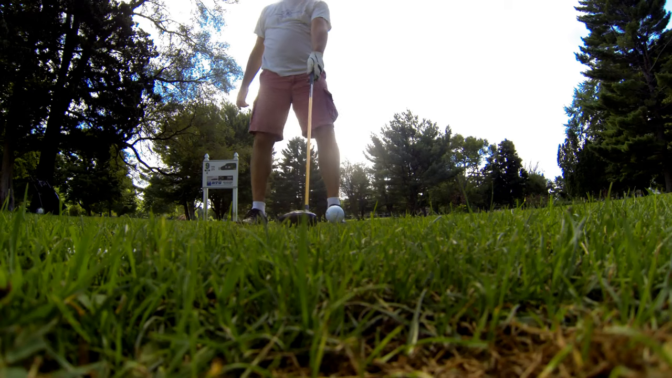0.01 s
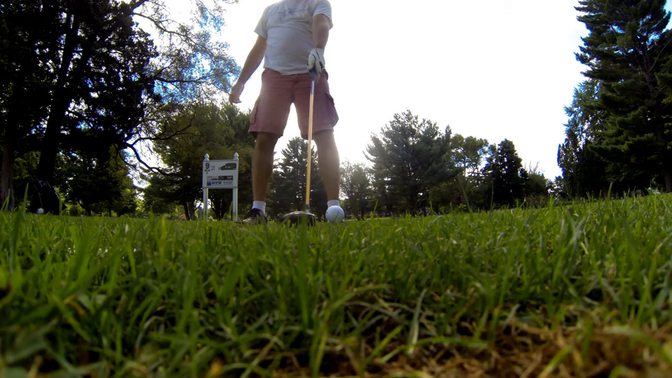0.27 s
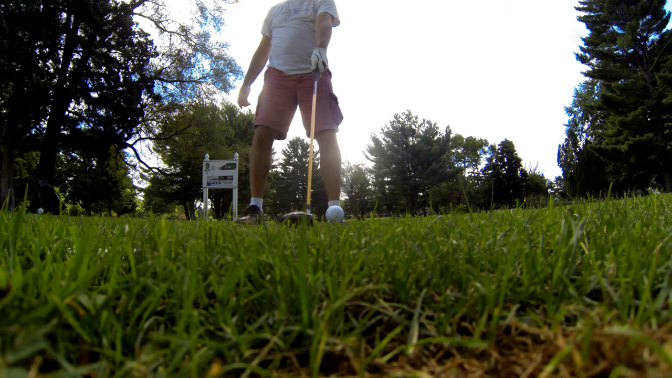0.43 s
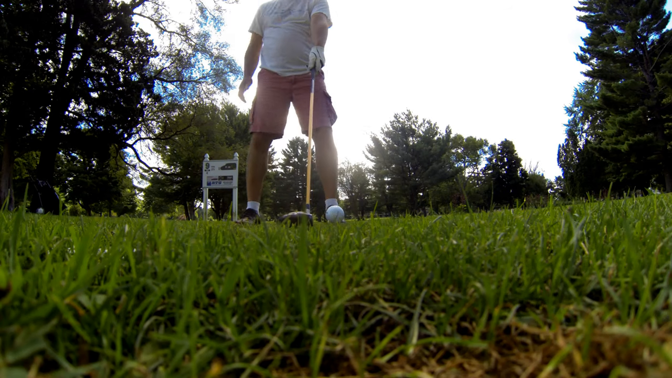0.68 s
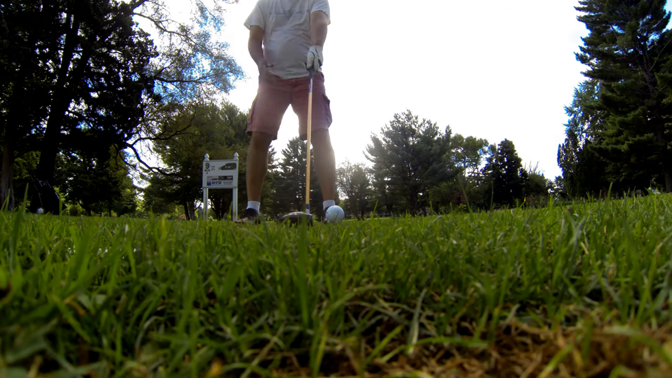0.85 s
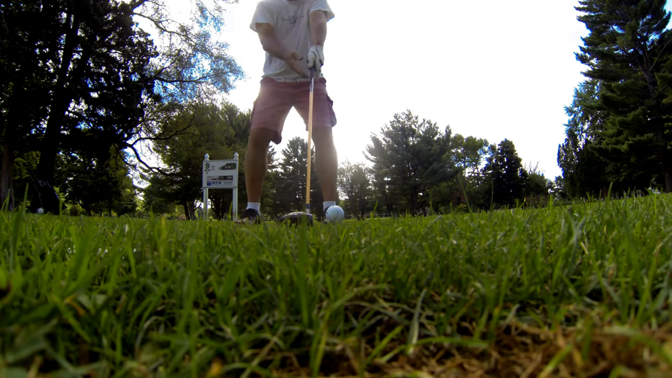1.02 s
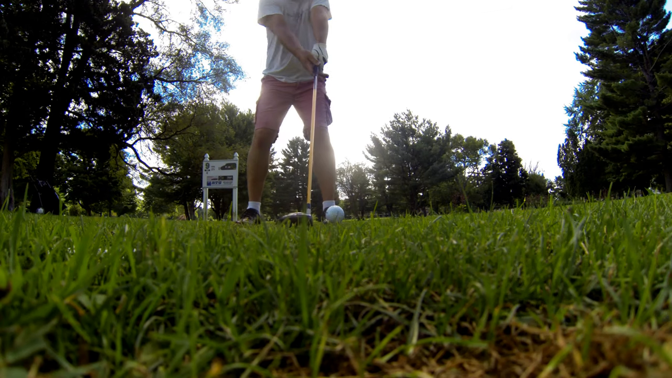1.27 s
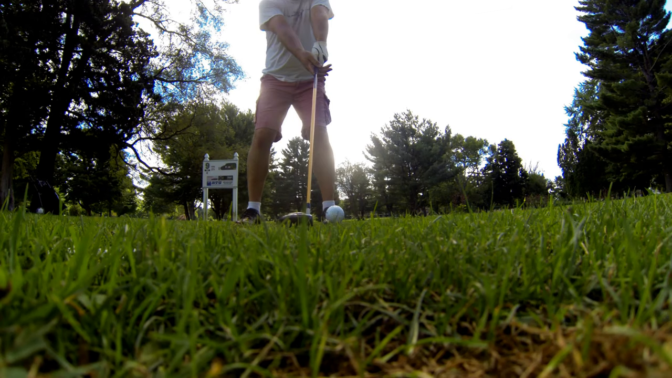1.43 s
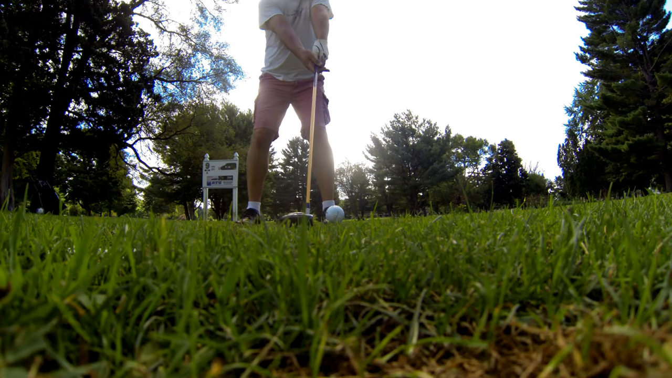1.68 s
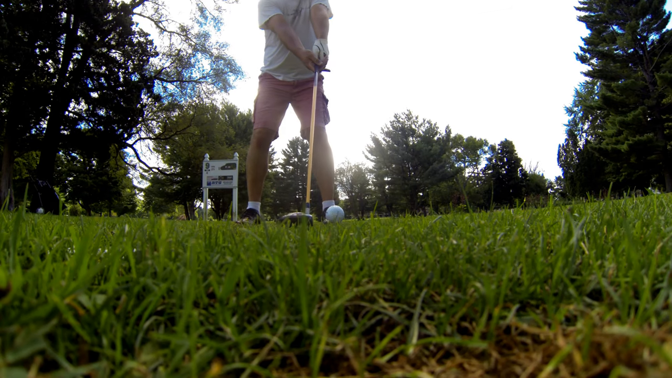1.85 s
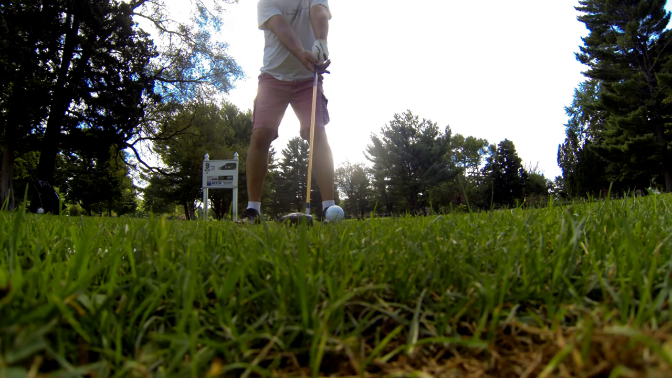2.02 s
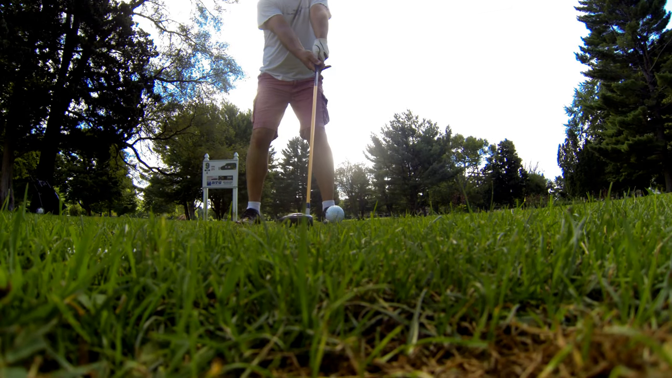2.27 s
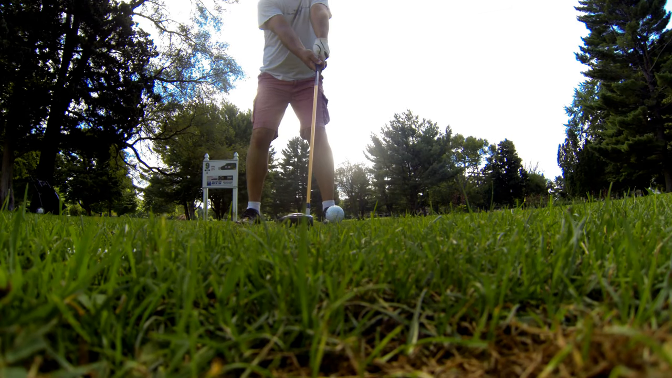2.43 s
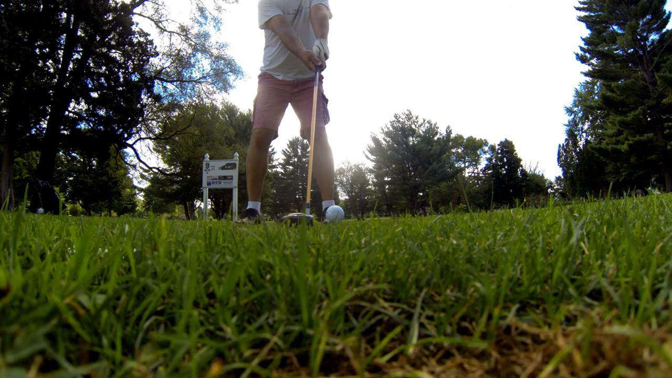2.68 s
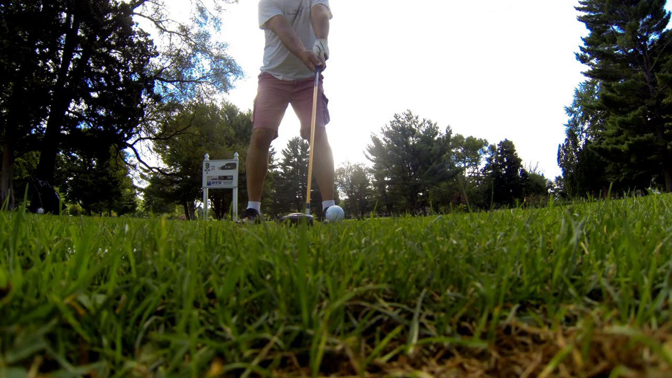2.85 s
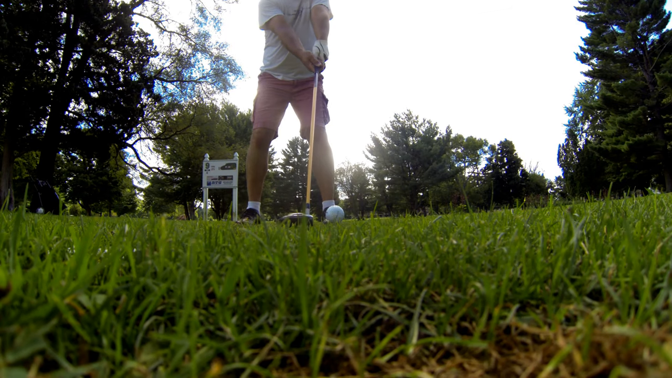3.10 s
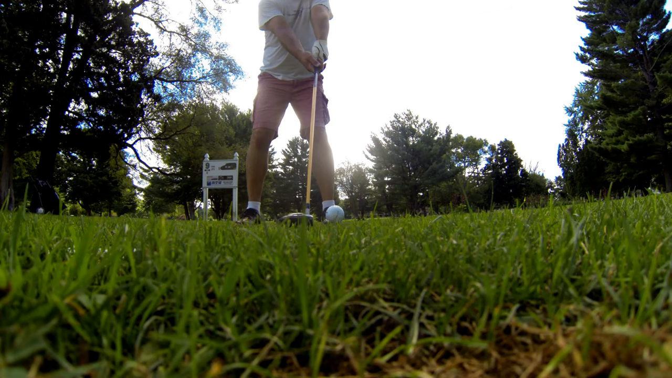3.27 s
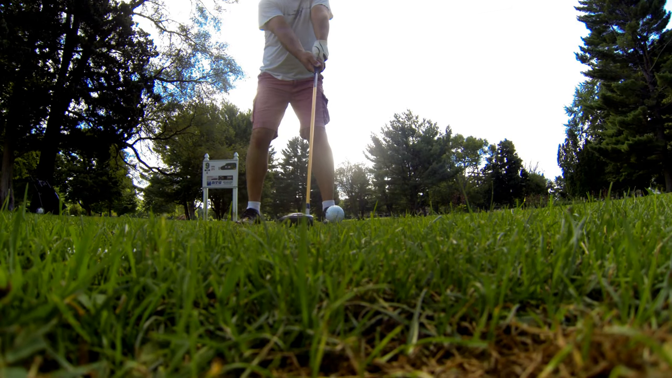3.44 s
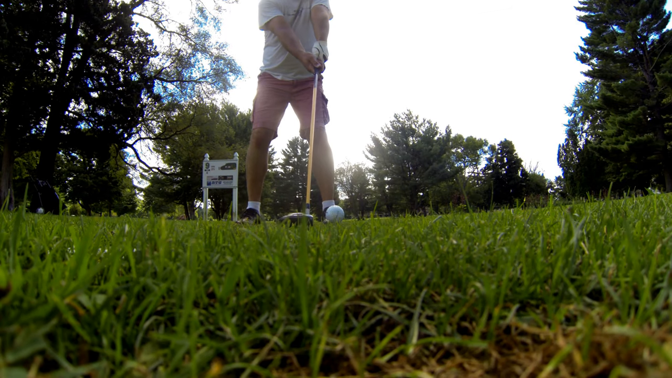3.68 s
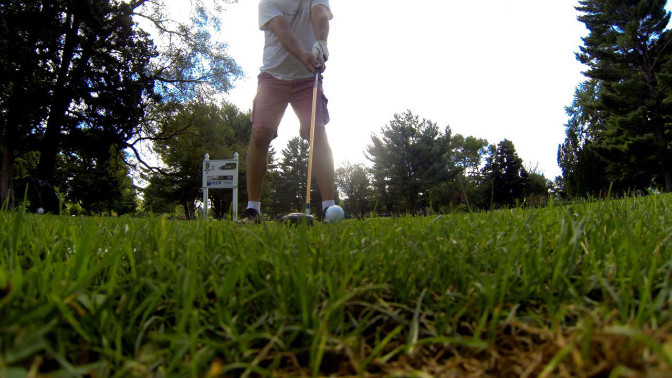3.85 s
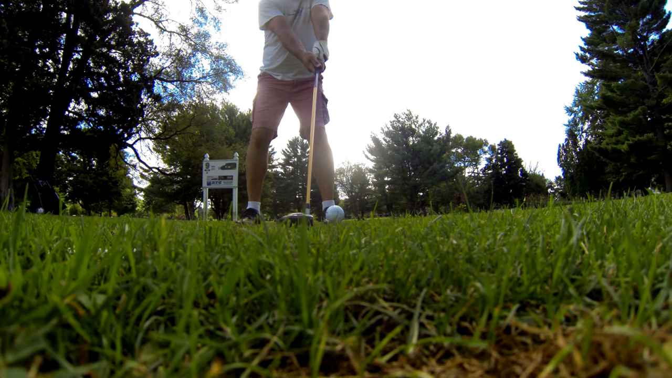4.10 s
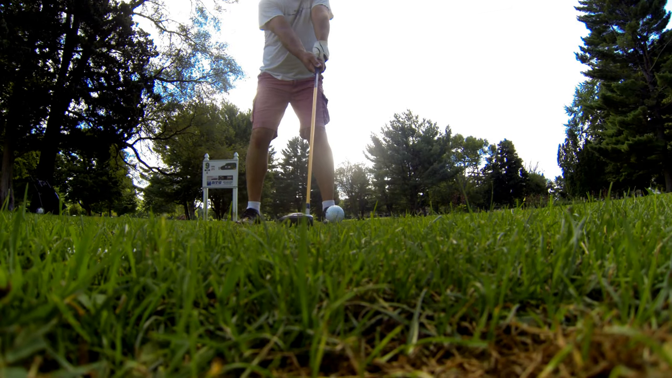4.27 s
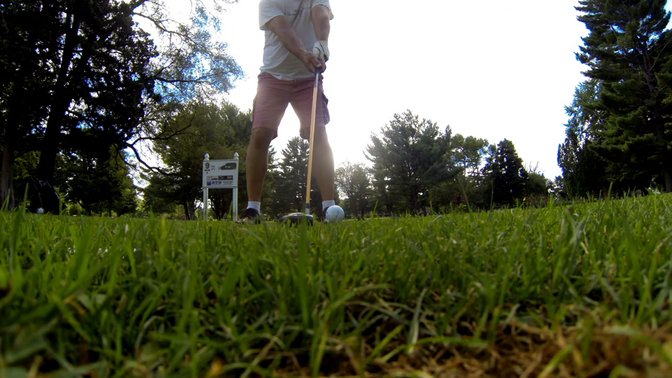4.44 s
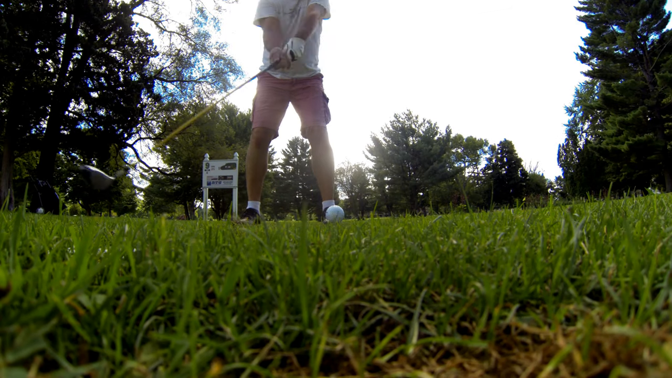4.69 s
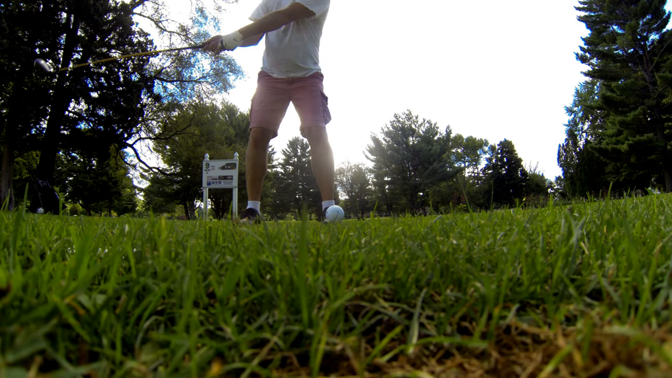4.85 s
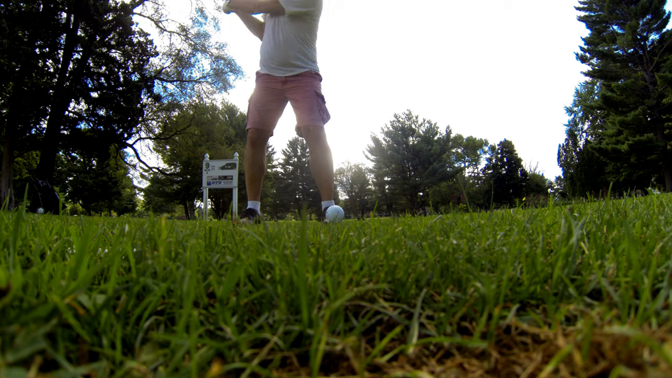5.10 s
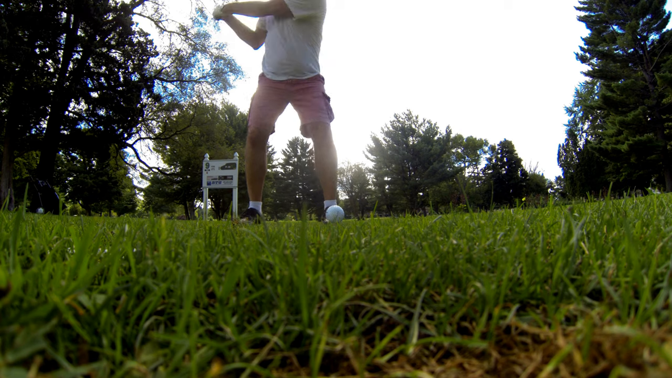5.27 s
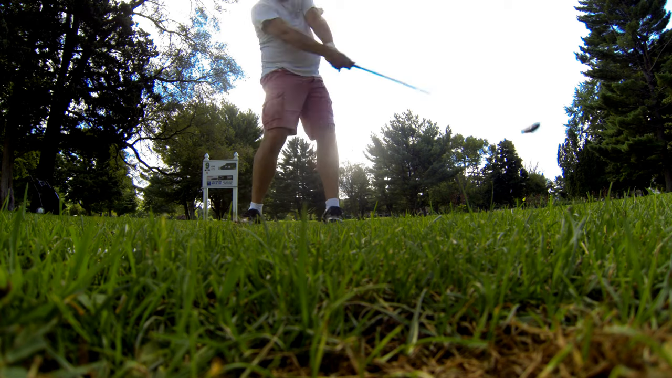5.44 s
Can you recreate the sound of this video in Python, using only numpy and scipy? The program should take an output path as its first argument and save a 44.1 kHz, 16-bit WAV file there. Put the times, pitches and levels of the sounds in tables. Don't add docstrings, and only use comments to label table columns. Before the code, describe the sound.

Low far-off engine rumble fills an open outdoor space, with barely audible shimmering insects and sparse bird chirps. Feet shift with small dull ticks around two and a half seconds. Near the end a quick rising swish leads into a single hard golf crack, close enough to slightly overload the recorder. A short high metal ring sinks in pitch, and trees return a brief wash and faint slap before quiet resumes.

```python
import sys
import numpy as np
from scipy import signal
from scipy.fft import rfft, irfft, next_fast_len
from scipy.io import wavfile
from scipy.ndimage import uniform_filter1d

SR = 44100
rng = np.random.default_rng(int(sys.argv[2]) if len(sys.argv) > 2 else 0)


def materialize(psi):
    bounded = np.clip(np.atleast_2d(psi).T, -1, 1)
    quanta = np.round(bounded * 32767).astype(np.int16)
    wavfile.write(sys.argv[1], SR, quanta)


def ratio(d):
    e = np.asarray(d, float) / 20
    return 10 ** e


N = 243431

# pitch_hz, density_db
AIR_SPECTRUM = [(12, -4), (22, -2), (99, 0), (150, -3), (237, -9.5), (335, -16), (600, -24), (1140, -30),
                (2200, -39), (3700, -45.5), (4900, -46.5), (7000, -50.5), (10500, -57), (15500, -64)]
# pitch_hz, width_hz, level_db
ENGINE_LINES = [(77, 8, -54), (110, 10, -52), (145, 3, -49.5), (286, 2, -55), (440, 3, -66)]
# pitch_hz, density_db
INSECT_SPECTRUM = [(8000, -9), (10500, -6), (12300, -1.5), (13500, -4), (15000, -22)]
# buzz_start_s, level_db
INSECT_PHRASES = [
    (1.36, -77),
    (3.47, -77),
    (5.58, -77),
]
# start_s, length_s, start_hz, end_hz, level_db
CLEAR_NOTES = [
    (.665, .015, 880, 900, -52),
    (.678, .013, 1090, 1120, -52),
    (2.68, .012, 2100, 2350, -54.5),
    (2.945, .02, 7100, 7650, -76),
    (4.375, .03, 5500, 5490, -72),
    (4.43, .052, 5470, 5530, -63),
]
# start_s, length_s, start_hz, end_hz, level_db
RASPY_NOTES = [
    (1.73, .06, 7300, 7100, -73),
    (2.99, .055, 6900, 7400, -73),
    (4.33, .12, 4300, 4300, -74),
    (4.78, .1, 6700, 7300, -71),
]
# start_s, peak_db, top_hz
FOOT_TICKS = [
    (2.335, -52, 6000),
    (2.378, -54, 3000),
    (2.501, -47, 3000),
    (2.5312, -45.5, 2400),
    (2.5318, -52, 6500),
    (2.5364, -56, 5000),
    (3.01, -53, 3000),
]
# pitch_hz, level_db
WHINE_TONES = [(7028, -75), (14054, -74.5)]
# pitch_hz, density_db
TREE_SPECTRUM = [(200, -22), (500, -2.5), (2300, -7), (2700, -15), (3150, -7), (3650, -19), (4400, -9),
                 (5800, -4), (8000, -11.5), (11500, -16.5), (15500, -33)]
# pitch_hz, density_db
FAR_SPECTRUM = [(250, -14), (700, 2.5), (1500, 2.5), (2800, -6.5), (3500, -27)]
# delay_s, attack_s, hold_s, peak_db, release_db_per_s
GRASS_RETURN = (.001, .003, .001, -31.5, 620)
TREE_LINE_RETURN = (.015, .05, .12, -39.5, 160)
FAR_WALL_RETURN = (.055, .022, .2, -57, 100)
FAR_SLAP_RETURN = (.15, .027, .008, -47.5, 170)
# time_s, shedding_hz, rush_db
CLUB_PASS = [
    (5.0, 290, -100),
    (5.12, 328, -57),
    (5.188, 440, -60),
    (5.22, 648, -35),
    (5.236, 830, -22),
    (5.246, 935, -24.5),
    (5.254, 825, -18.5),
    (5.27, 740, -31),
    (5.315, 400, -54),
]
# pitch_hz, density_db
RUSH_SPECTRUM = [(150, 3), (400, 3.5), (900, 1), (1800, -8.5), (3000, -21), (5000, -28), (9000, -42),
                 (15000, -50)]
# pitch_hz, density_db
HISS_SPECTRUM = [(4000, -10), (6000, 2.5), (9000, -0.1), (15000, -6)]
# centre_s, length_s
SHEDDING_SPELLS = [(5.197, .014), (5.206, .014), (5.214, .007), (5.2195, .007), (5.228, .009),
                   (5.239, .014), (5.2465, .009), (5.2535, .0065), (5.27, .008), (5.284, .012), (5.3, .016)]
# pitch_hz, level_db, t60_s
BALL_MODES = [(2600, 2.2, 0.01), (1570, -9, 0.013), (1100, -8, 0.011), (547, -9, 0.0071),
              (3980, -14.5, 0.01)]
# pitch_hz, level_db, t60_s
HEAD_MODES = [(5480, -19, .135), (5300, -22.5, .08), (6850, -38, .15), (7600, -30, .02), (12100, -44, .15),
              (10650, -28, .055), (10380, -35, .04), (12690, -29, .045), (14400, -37, .06)]
# delay_s, level_db
NEAR_ECHOES = [
    (.0125, -18.5),
    (.0172, -30),
    (.04, -44),
]

HIT_S = 5.2578
T = np.arange(N) / SR
AFTER_HIT = np.maximum(T - HIT_S, 0)


def in_time(rows):
    s, *columns = np.transpose(rows)
    return [np.interp(T, s, c) for c in columns]


def rms_one(x):
    return x / np.sqrt(np.mean(x ** 2) + 1e-20)


def coloured(spectrum):
    size = next_fast_len(N)
    hz, db = np.transpose(spectrum)
    grid = np.maximum(np.arange(size // 2 + 1) * SR / size, 1)
    shape = ratio(np.interp(np.log(grid), np.log(hz), db, left=-60, right=-90))
    return rms_one(irfft(rfft(rng.standard_normal(size)) * shape, size)[:N])


def drift(rate_hz):
    r = np.exp(-2 * np.pi * rate_hz / SR)
    return rms_one(signal.lfilter([1], [1, -2 * r, r * r], rng.standard_normal(N + SR))[SR:])


def ring(x, hz, t60):
    r = ratio(-60 / (t60 * SR))
    w = 2 * np.pi * hz / SR
    return signal.lfilter([0, np.sin(w)], [1, -2 * r * np.cos(w), r * r], x + 1e-18)


def bump(centre, length):
    return np.cos(np.pi * np.clip((T - centre) / length, -.5, .5)) ** 2


def swell(start, attack, hold, db, release_db, sag_db=0.):
    t = T - start
    fall_db = sag_db * np.clip(t - attack, 0, hold) + release_db * np.maximum(t - attack - hold, 0)
    return np.clip(t / attack, 0, 1) ** 2 * ratio(db - fall_db)


def background():
    out = ratio(-39.5 - 0.82) * coloured(AIR_SPECTRUM)
    for hz, width_hz, db in ENGINE_LINES:
        t60 = np.log(1000) / np.pi / width_hz
        out = out + ratio(db) * rms_one(ring(rng.standard_normal(N), hz, t60))
    rumble_band = signal.butter(2, [60, 230], "band", fs=SR, output="sos")
    rumble = signal.sosfilt(rumble_band, out)
    out = out + (ratio(1.6 * drift(7) - .4) - 1) * rumble

    near = np.zeros(N)
    for s, db in INSECT_PHRASES:
        near += ratio(db - 3) * bump(s - .03, .24)
        near += swell(s, .26, .71, db, 600)
    chorus = ratio(-82 - 1.1 * T)
    throb = ratio(1.7 * drift(40))
    return out + np.hypot(near, chorus) * throb * coloured(INSECT_SPECTRUM)


def whine():
    gate = np.zeros(N)
    wakes_per_s = 12
    wakes = np.arange(int(N / SR * wakes_per_s) + 1) / wakes_per_s - .002
    late_s = .013 * np.clip(rng.uniform(-1, 1.3, len(wakes)), 0, 1)
    for s in wakes + late_s:
        for lag in (0, .02):
            begin = max(round((s + lag) * SR), 0)
            gate[begin:round((s + lag + .015) * SR)] = 1
    phase = 2 * np.pi * T + .00003 * drift(30)
    tones = sum(ratio(db) * np.sin(hz * phase) for hz, db in WHINE_TONES)
    return uniform_filter1d(gate, size=60) * tones


def small_sounds():
    out = np.zeros(N)
    rasp = drift(500)
    for notes, rough in ((CLEAR_NOTES, .25), (RASPY_NOTES, .9)):
        for start, length, hz0, hz1, db in notes:
            pitch_hz = np.interp(T, [start, start + length], [hz0, hz1])
            tone = np.sin(2 * np.pi * np.cumsum(pitch_hz) / SR)
            envelope = bump(start + length / 2, length * 1.7) * (1 - rough + rough * rasp)
            out += ratio(db) * envelope * tone

    crunch = rng.standard_normal(N)
    for s, db, top_hz in FOOT_TICKS:
        burst = crunch * (T > s) * np.exp(-np.abs(T - s) / .002)
        tick = signal.lfilter(*signal.butter(2, [1100, top_hz], "band", fs=SR), burst)
        out += ratio(db) * tick / np.max(np.abs(tick))
    return out


def trees():
    hiss = coloured(TREE_SPECTRUM)
    dull = signal.sosfilt(signal.butter(2, 9000, fs=SR, output="sos"), hiss)
    bright_db = -3 + 9 * np.exp(-AFTER_HIT / .06)
    patchy = ratio(1.8 * drift(70)) * dull
    patchy = patchy + ratio(bright_db + 1.8 * drift(70)) * (hiss - dull)

    returns = (GRASS_RETURN, FAR_WALL_RETURN, FAR_SLAP_RETURN)
    grass, wall, slap = (swell(HIT_S + lag, *shape) for lag, *shape in returns)
    line = swell(HIT_S + TREE_LINE_RETURN[0], *TREE_LINE_RETURN[1:], sag_db=45)
    far = np.hypot(wall, slap) * ratio(2.2 * drift(30)) * coloured(FAR_SPECTRUM)
    ridge = rms_one(ring(rng.standard_normal(N), 3180, .012))
    ridge = np.hypot(ratio(2) * wall, ratio(-5) * slap) * ridge
    return np.hypot(grass, line) * patchy + far + ridge


def swing():
    shedding_hz, rush_db = in_time(CLUB_PASS)
    phase = 2 * np.pi * np.cumsum(shedding_hz * (1 + .02 * drift(90))) / SR
    whistle_db = 6.5 + .76 * rush_db - 8 * (T > HIT_S)
    spells = sum(bump(s, length) for s, length in SHEDDING_SPELLS)
    whistle = spells * ratio(whistle_db) * (np.sin(phase) + .11 * np.sin(2 * phase))

    push = ratio(-10.5) * bump(5.2525, .024)
    push = push - ratio(-17) * bump(5.266, .018) - ratio(-19.5) * bump(5.279, .03)
    thud = ratio(-23.5) * bump(5.262, .044) * np.sin(2 * np.pi * 105 * T)
    rush = ratio(rush_db) * coloured(RUSH_SPECTRUM)
    hiss = ratio(-43 + .55 * rush_db) * coloured(HISS_SPECTRUM)
    return whistle + push + thud + rush + hiss


def strike():
    click = np.zeros(N)
    click[round(HIT_S * SR)] = -1
    knock = np.zeros(N)
    for hz, db, t60 in BALL_MODES:
        mode = ring(ring(click, hz, t60), hz, t60)
        knock = knock + ratio(db) * mode / np.max(np.abs(mode))
    knock = knock * bump(HIT_S, .0105) ** (1 / 2)

    crack = ratio(-3) * rng.standard_normal(N) * (AFTER_HIT > 0) * np.exp(-AFTER_HIT / .002)
    crack = signal.lfilter(*signal.butter(1, [8000, 10000], "stop", fs=SR), crack)
    crack = signal.lfilter([.2], [1, -.8], crack)
    knock = knock - ring(click, 2400, .003) + crack

    doppler = 1 - .067 * np.minimum(AFTER_HIT / .05, 1)
    receding_s = np.cumsum((AFTER_HIT > 0) * doppler) / SR
    head = np.zeros(N)
    for hz, db, t60 in HEAD_MODES:
        head += ratio(db - 60 * AFTER_HIT / t60) * np.sin(2 * np.pi * hz * receding_s)
    turned_away = np.clip((.046 - AFTER_HIT) / .0047, .05, 1)
    head = head * turned_away * (1 + .18 * drift(250))
    echoes = sum(ratio(db) * np.roll(knock, round(lag * SR)) for lag, db in NEAR_ECHOES)
    return knock + head + echoes


def scene():
    return (background() + small_sounds() + trees() + swing() + strike())[None]


def top_cut(x):
    return signal.sosfilt(signal.butter(12, 15100, fs=SR, output="sos"), x)


def record(dry):
    ceiling = .97
    loud = (dry + whine()) / ceiling
    rounded = ceiling * loud / (1 + np.abs(loud) ** 6) ** (1 / 6)
    low_pass = signal.ellip(6, .3, 30, 15150, fs=SR, output="sos")
    passed = signal.sosfilt(low_pass, rounded)
    return top_cut(passed)


dry = scene()
out = record(dry)
materialize(out)
```